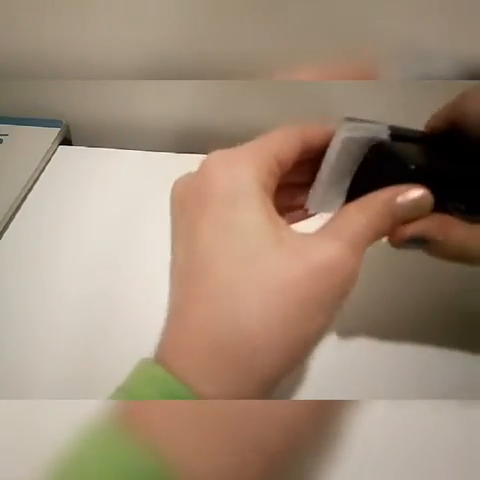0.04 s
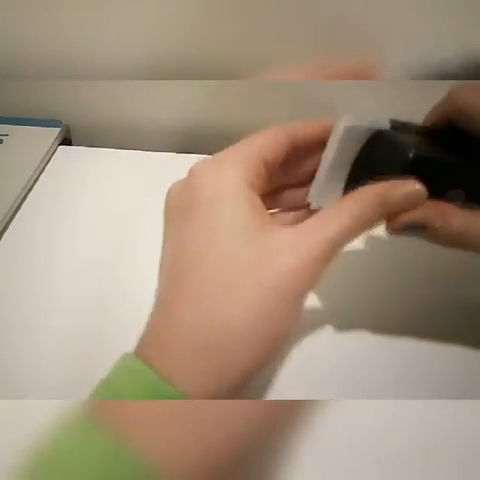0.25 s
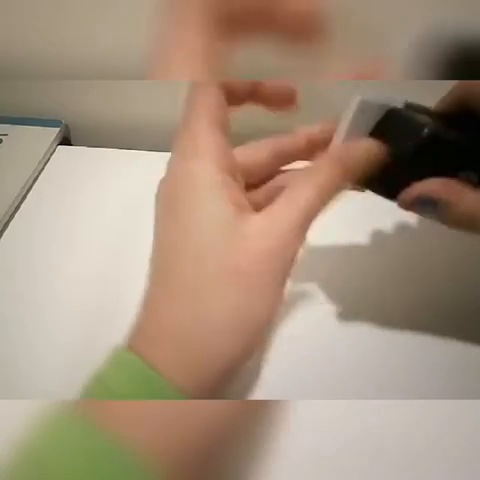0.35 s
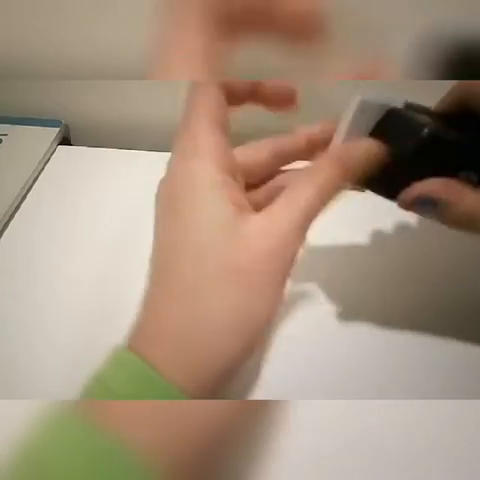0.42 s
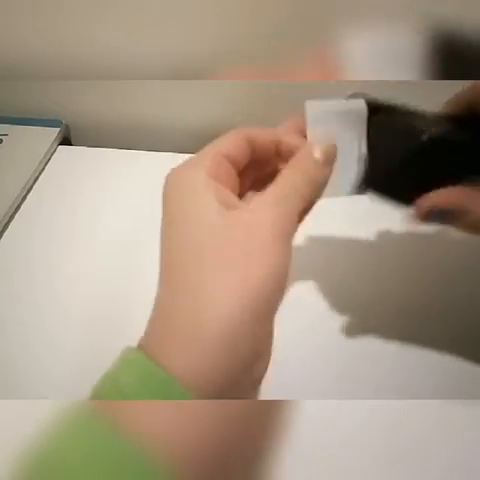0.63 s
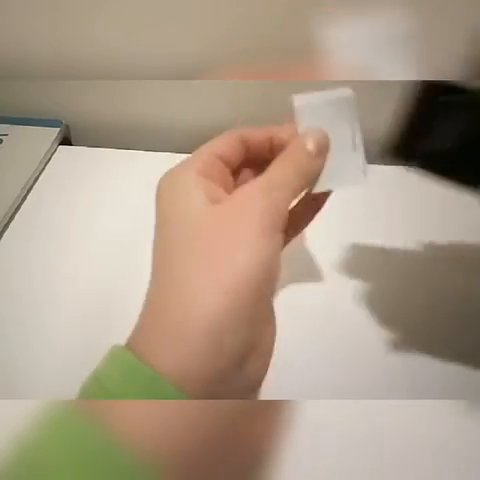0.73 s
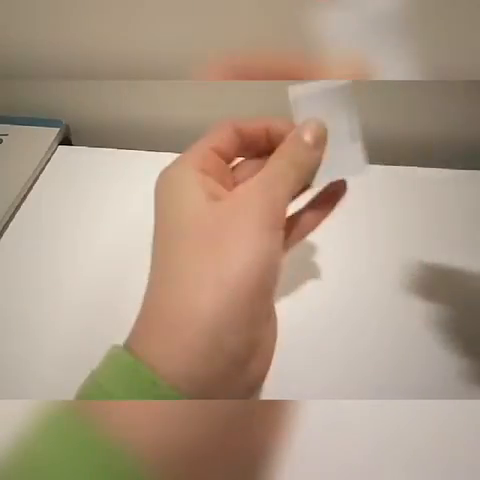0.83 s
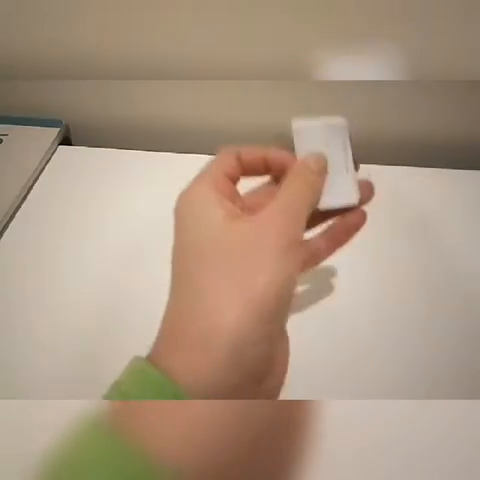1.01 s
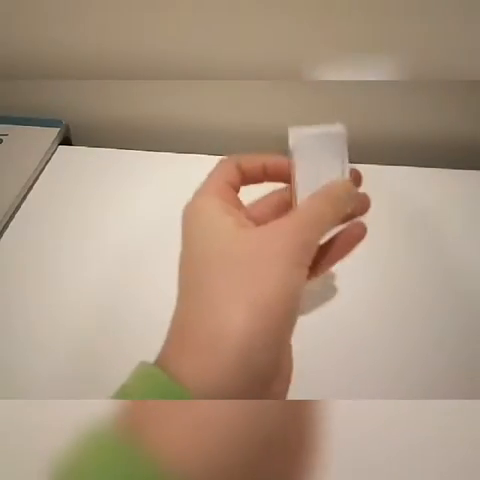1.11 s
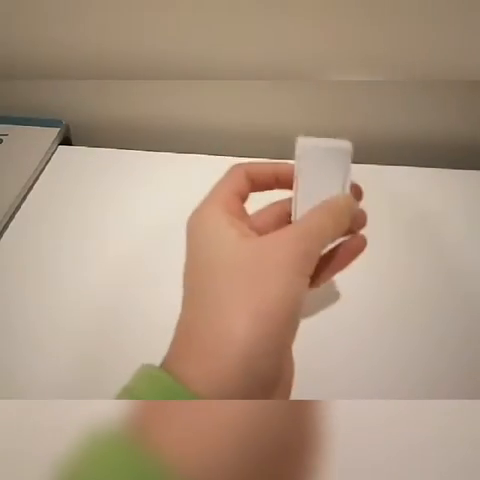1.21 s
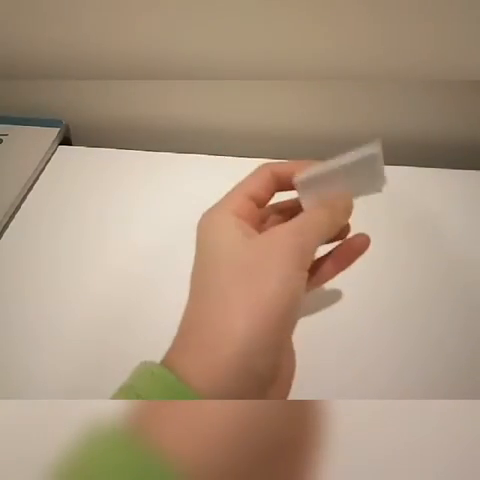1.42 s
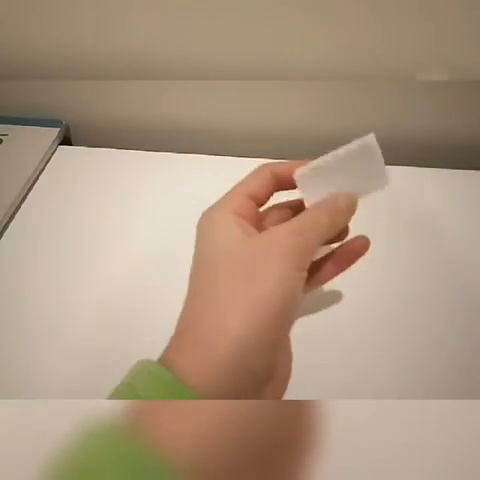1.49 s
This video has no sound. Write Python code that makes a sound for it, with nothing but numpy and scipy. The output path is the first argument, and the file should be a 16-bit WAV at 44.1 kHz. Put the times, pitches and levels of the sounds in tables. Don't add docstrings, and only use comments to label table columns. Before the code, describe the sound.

Close, sharp metallic stapler crunch with clicking spring release, followed by a crisp little paper flick

```python
import sys
import numpy as np
from scipy import signal
from scipy.fft import rfft, irfft
from scipy.io import wavfile
from scipy.ndimage import uniform_filter1d

SR = 44100
rng = np.random.default_rng(int(sys.argv[2]) if len(sys.argv) > 2 else 0)


def invert_db(x):
    u = np.asarray(x, float) / 20
    return 10 ** u


def wav_record(signal):
    frames = np.transpose(np.atleast_2d(signal))
    bounded = np.clip(frames, -1, 1)
    quanta = np.round(bounded * 32767).astype(np.int16)
    wavfile.write(sys.argv[1], SR, quanta)


N = 68355

KNEE_HZ = 6400

# pitch_hz, level_db (per Hz)
HISS_COLOUR = [(300, -7), (680, -10), (950, -11.5), (2400, -16.5), (6400, -20)]
# pitch_hz, level_db (per Hz)
RUMBLE_COLOUR = [(20, -16), (90, 1), (215, -2.5), (400, -13.5), (600, -32)]
# pitch_hz, t60_s
ROOM_T60 = [(150, 0.47), (500, 0.32), (1300, 0.36), (3200, 0.37), (6000, 0.37), (10000, .25)]
# start_s, level_db, centre_hz, ringing_hz, knock_db
SMALL_TICKS = [(0.092, -49, 5100, 1755, -54.5), (0.118, -59, 5500, 5300, -68),
               (0.1257, -42.5, 2940, 1300, -39.5), (0.137, -67, 3000, 3720, -49),
               (0.1792, -50.5, 1500, 2890, -48), (0.3555, -43, 4500, 4800, -85),
               (0.798, -49, 2970, 2390, -54), (0.865, -58, 2500, 1710, -53), (.94, -52.5, 4510, 3190, -46),
               (.988, -54, 2980, 5270, -72.5), (0.998, -54, 4500, 5570, -64), (1.014, -46, 900, 606, -73),
               (1.026, -54, 1680, 1810, -44), (1.034, -57, 2020, 1770, -46),
               (1.0434, -30.5, 3200, 4080, -35.5), (1.046, -22.5, 6240, 6480, -49),
               (1.049, -39.5, 5200, 4900, -46), (1.157, -55, 3000, 2150, -76),
               (1.191, -40.5, 3080, 3900, -59), (1.496, -46, 7000, 5200, -54.5),
               (1.496, -58, 2530, 1475, -71), (1.542, -57.5, 4200, 3900, -76)]
# start_s, level_db, pitch_hz
DESK_BUMPS = [
    (.797, -52.5, 85),
    (1.035, -47, 60),
    (1.045, -47.5, 146),
]
# start_s, peak_db, pitch_hz, swell_s
SHORT_PINGS = [(0.222, -52, 6800, 0.0022), (0.238, -29, 3500, 0.001), (.2405, -34, 4300, 0.0013),
               (0.3698, -36, 4370, .001), (.373, -38, 3580, 0.00087), (.383, -36.5, 1250, 0.0017),
               (0.5357, -28, 3200, 0.0014), (0.608, -34, 3264, 0.0022), (.646, -37.5, 3080, 0.0022),
               (.682, -47.5, 3180, 0.0028), (.796, -48.5, 3280, 0.0013), (0.797, -51.5, 1720, 0.0019),
               (.797, -57, 5550, 0.0011), (.987, -53, 3130, 0.0016), (1.0254, -38.5, 1840, 0.0018),
               (1.033, -34, 1830, 0.0014), (1.034, -37, 3100, .001), (1.037, -40, 6140, 0.0013),
               (1.0435, -29, 3350, 0.00068), (1.0485, -22, 4820, 0.00073), (1.053, -35, 4800, 0.0018),
               (1.064, -38.5, 3900, .001), (1.069, -36, 4800, 0.00093), (1.081, -44, 6760, 0.0018),
               (1.087, -42.5, 4870, 0.0033), (1.091, -49, 6420, 0.0015), (1.136, -53, 3900, 0.0011),
               (1.15, -49, 3900, 0.0018), (1.154, -44, 3120, 0.0011), (1.161, -45, 3260, .0015),
               (1.161, -49, 5630, 0.0011), (1.167, -48, 5500, 0.00088), (1.186, -45, 3900, .0015),
               (1.192, -38, 3010, 0.0012), (1.196, -36, 3900, .001), (1.199, -44, 3850, 0.0011),
               (1.199, -51, 4900, 0.0028), (1.207, -42, 3100, 0.00072), (1.215, -49, 3260, .0015),
               (1.174, -53.5, 530, 0.0033), (1.193, -60, 593, 0.0047), (1.497, -49.5, 1446, 0.0019),
               (1.495, -51, 5150, 0.0017), (1.495, -47, 6280, 0.0011), (1.496, -54, 3100, 0.0014),
               (0.547, -37, 1280, 0.0034), (0.556, -32, 1377, 0.0036), (.575, -36, 1216, .003),
                (.61, -32, 1361, 0.0076), (0.637, -38, 1249, .005), (0.654, -44.5, 1270, 0.0041),
                (1.053, -43.5, 2010, 0.0021), (1.057, -34, 8400, .0015), (1.153, -52, 1960, 0.0018),
                (1.16, -52, 2050, .002), (1.19, -52.5, 1430, 0.0047), (.125, -37, 11400, .0006)]
# start_s, rise_s, fall_s, level_db, thud_lead_s
SNAPS = [
    (.2290, 0.0029, 0.0017, -15, 0.00045),
    (0.3611, 0.0016, .0016, -17.5, 0.0008),
    (0.5238, 0.0031, .0018, -19, 0.0015),
]
# pitch_hz, width_hz, level_db
SNAP_BODIES = [
    [(386, 148, -9), (1028, 95, -26.5), (1860, 91, -14.5), (2470, 63, -33.5), (2924, 99, -9),
     (3513, 150, 0.5), (4380, 140, -14), (4900, 270, -7), (5507, 230, -9), (7100, 93, -19)],
    [(474.4, 140, -6.5), (1184, 430, -7), (1864, 180, -9.0), (2478, 75, -7), (3396, 430, -4.0),
     (3900, 330, -9.0), (5470, 240, -30), (5520, 410, -8), (6654, 120, -22.0),
     (7110, 120, -18.0)] + [(678, 180, -21.5)],
    [(335, 300, -5.5), (1209, 170, -4.5), (1728, 120, -5.5), (2945, 110, -2.5), (3268, 170, 3.0),
     (3932, 430, 0.0), (4806, 120, -3), (5680, 330, -15), (6350, 150, -7.5),
     (7070, 330, -47.0)] + [(800, 200, -20.0), (2202, 67, -12), (5270, 200, -10)],
]
# pitch_hz, level_db (per Hz)
CRACK_COLOUR = [(40, -54), (120, -31.5), (400, -16), (800, -30.5), (1800, -13), (2400, -11.5), (3400, -3),
                (6400, -6)]
CRACK_LEVELS = [-5, -11.5, -3.5]
# level_db, ducking_db, recovery_s, decay_scale, damped_at_s
ROOM_ANSWERS = [
    (-24.5, 4.5, 0.042, 0.92, 0.3415),
    (-33.5, -10.5, 0.0106, 0.95, .51),
    (-24, 6.5, 0.044, 1.132, 0.96),
]
# pitch_hz, level_db (per Hz)
ANSWER_COLOURS = [
    [(100, -29), (420, -6.5), (760, -22), (1500, -12.5), (3500, -6), (6400, -4)],
    [(150, -39), (500, -5), (1370, -7.5), (3400, -4), (6400, -10.5)],
    [(130, -28), (530, -11.5), (700, -13.5), (1240, -3.5), (1550, -11), (4200, -9.5), (6400, -12)],
]
# pitch_hz, width_hz, boost_db
SPRING_RINGS = [
    [(959, 250, 5), (1380, 78, 9), (3500, 420, 8), (4460, 220, 8)],
    [(1300, 250, 8.5), (3423, 230, 3.5), (4300, 200, 1)],
    [(1250, 330, 4), (1350, 190, 4.5), (2990, 60, 12), (3200, 140, 8.5), (4400, 120, 6.5)],
]
DESK_LEVELS = [-20, -15, -21]
# start_s, level_db
FLICK_PRESSURE = [(0.993, -62), (1.015, -52), (1.042, -33), (1.05, -32.5), (1.072, -41), (1.1, -55),
                  (1.13, -51.5), (1.161, -64)]
# start_s, level_db
RUB_PRESSURE = [(1.13, -64), (1.152, -52.5), (1.172, -49), (1.185, -42.5), (1.198, -38.5), (1.215, -48.5),
                (1.239, -60), (1.28, -72)]
# pitch_hz, level_db (per Hz)
PAPER_COLOURS = [
    [(100, -11), (1000, -14), (1400, -9), (2800, -16.5), (6400, -12)],
    [(100, -21.5), (560, -10.5), (900, -23), (2400, -8.5), (3900, -4), (6400, -11)],
]
# pitch_hz, width_hz, boost_db
SHEET_BANDS = [(1870, 320, 7), (3950, 570, 6.5), (4800, 250, 5.5), (6270, 257, 5)]
# pitch_hz, level_db
MIC_RESPONSE = [(30, -2.5), (70, 0), (6300, -0.5), (6900, -8), (7800, -18.5), (9000, -21), (12000, -31),
                (15500, -26)]


def evened(x):
    return x / np.sqrt(np.mean(x ** 2) + 1e-20)


def read(points, hz):
    f, value = np.transpose(points)
    return np.interp(np.log(hz + 1), np.log(f + 1), value)


def source_colour(points, hz):
    return read(points, np.minimum(hz, KNEE_HZ))


def octaves_above(hz, start_hz):
    return np.log2(np.maximum(hz / start_hz, 1))


def resonances(bands, hz):
    return sum(db / (1 + (2 * (hz - f) / width) ** 2) for f, width, db in bands)


def coloured(x, curve_db):
    hz = np.fft.rfftfreq(len(x), 1 / SR)
    return evened(irfft(rfft(x) * invert_db(curve_db(hz)), len(x)))


def add(mix, start_s, sound):
    part = mix[round(start_s * SR):][:len(sound)]
    part += sound[:len(part)]


def drift(size):
    return evened(uniform_filter1d(uniform_filter1d(rng.standard_normal(N), size), size))


def room_floor():
    hiss = coloured(rng.standard_normal(N), lambda hz: source_colour(HISS_COLOUR, hz) - 30 * (hz < 300))
    rumble = coloured(rng.standard_normal(N),
                      lambda hz: read(RUMBLE_COLOUR, hz) - 40 * np.clip(hz / 300 - 1, 0, 2))
    return hiss * invert_db(-62.5 + drift(2000)) + rumble * invert_db(-65.5 + 1.5 * drift(1200))


def room_tail(colour_db, decay_scale, rings=(), size=22050):
    bloom_s = 0.035
    hz, t, z = signal.stft(rng.standard_normal(size), SR, nperseg=512)
    colour = colour_db(hz)
    bloom = 1 - np.exp(-t / bloom_s)
    z = z * invert_db(colour[:, None] + resonances(rings, hz[:, None]) * bloom)
    z = z / np.sqrt(np.mean(invert_db(2 * colour)))
    t60_s = decay_scale * read(ROOM_T60, hz)[:, None]
    return signal.istft(z * invert_db(-60 * t / t60_s), SR, nperseg=512)[1][:size]


def small_ticks():
    fall_s, knock_fall_s, rise_s = 0.0041, 0.0017, 0.00065
    spread, band_db, room_db = 0.87, -10, -14.5
    out, t = np.zeros(N), np.arange(1024) / SR
    for start_s, db, centre_hz, band_hz, knock_db in SMALL_TICKS:
        def colour(hz):
            return np.maximum(-6 * (np.log((hz + 50) / centre_hz) / spread) ** 2, -40)
        puff = coloured(rng.standard_normal(len(t)), colour)
        puff += invert_db(band_db) * 2 * np.sin(2 * np.pi * band_hz * t)
        knock_hz = 516 * rng.uniform(0.87, 0.98)
        knock = np.sin(2 * np.pi * knock_hz * t) * np.exp(-t / knock_fall_s)
        tick = invert_db(db + 3) * puff * np.exp(-t / fall_s) + invert_db(knock_db + 6) * knock
        add(out, start_s, np.clip(t / rise_s, 0, 1) * tick)
        echo = room_tail(colour, 0.77, size=8192)
        fade_in = np.clip(np.arange(len(echo)) / 200, 0, 1)
        add(out, start_s, echo * fade_in * invert_db(db + room_db))
    return out


def pings():
    out, t = np.zeros(N), np.arange(2048) / SR
    for start_s, db, hz, swell_s in SHORT_PINGS:
        swell = (t / swell_s * np.exp(1 - t / swell_s)) ** 1.2
        add(out, start_s, invert_db(db) * swell * np.sin(2 * np.pi * hz * t))
    return out


def snap(rise_s, fall_s, level_db, lead_s, body, crack_db):
    t = np.arange(0, 0.03, 1 / SR)
    after_thud = t - lead_s
    phases = rng.uniform(0, 2 * np.pi, 16)
    out = np.zeros(len(t))
    for (hz, width_hz, db), phase in zip(body, phases):
        bright = hz > 700
        u = after_thud if bright else t
        decay = np.exp(-(np.maximum(u - rise_s, 0) / fall_s * width_hz / 240) ** 1.3)
        shape = np.clip(u / rise_s, 0, 1) ** 2 * decay
        tone = np.sin(2 * np.pi * hz * t + phase * bright)
        out += invert_db(db) * np.sqrt(width_hz / 160) * shape * tone
    crack = coloured(rng.standard_normal(len(t)),
                     lambda hz: source_colour(CRACK_COLOUR, hz) - 5 * octaves_above(hz, KNEE_HZ))
    decay = np.exp(-(np.maximum(after_thud - rise_s, 0) / fall_s / 2.2) ** 2.4)
    out += invert_db(crack_db) * crack * np.clip(after_thud / rise_s, 0, 1) ** 2 * decay
    return invert_db(level_db + 5.5) * out


def snap_answer(start_s, answer, colour, rings, desk_db):
    level_db, duck_db, recovery_s, decay_scale, damped_at_s = answer
    desk_hz, desk_t60_s, damp_s = 521, 0.45, 0.0046
    echo = room_tail(lambda hz: source_colour(colour, hz) - 8.5 * octaves_above(hz, KNEE_HZ),
                     decay_scale, rings)
    t = np.arange(len(echo)) / SR
    waver = np.cumsum(uniform_filter1d(rng.standard_normal(len(t)), 900)) * 0.06
    echo = echo + invert_db(desk_db - 60 * t / desk_t60_s) * np.sin(2 * np.pi * desk_hz * t + waver)
    damped = invert_db(-12 * np.clip((t + start_s - damped_at_s) / damp_s, 0, 1))
    gain = invert_db(level_db - duck_db * np.exp(-t / recovery_s))
    return echo * np.clip(t / 0.0026, 0, 1) * damped * gain


def stapler():
    out = np.zeros(N)
    for row, body, crack_db, answer, colour, rings, desk_db in zip(
            SNAPS, SNAP_BODIES, CRACK_LEVELS, ROOM_ANSWERS, ANSWER_COLOURS, SPRING_RINGS, DESK_LEVELS):
        start_s, rise_s, fall_s, level_db, lead_s = row
        add(out, start_s - lead_s, snap(rise_s, fall_s, level_db, lead_s, body, crack_db))
        add(out, start_s, snap_answer(start_s, answer, colour, rings, desk_db))
    return out


def desk_bumps():
    fall_s = 0.0043
    out, t = np.zeros(N), np.arange(4096) / SR
    for start_s, db, hz in DESK_BUMPS:
        swell = t / fall_s * np.exp(-t / fall_s)
        add(out, start_s, invert_db(db + 10) * swell * np.sin(2 * np.pi * hz * t))
    return out


def patchy(x):
    patch_db = 5
    z = signal.stft(x, nperseg=128)[2]
    field = uniform_filter1d(rng.standard_normal(z.shape), 3, axis=0)
    field = evened(uniform_filter1d(field, 4, axis=1))
    return evened(signal.istft(z * invert_db(patch_db * field), nperseg=128)[1][:N])


def paper():
    grains_per_s, grain_db, clump_s = 7900, 2, 0.0015
    out = np.zeros(N)
    for pressure, colour in zip((FLICK_PRESSURE, RUB_PRESSURE), PAPER_COLOURS):
        grains = (rng.random(N) < grains_per_s / SR) * invert_db(grain_db * rng.exponential(1, N))
        clumps = evened(signal.lfilter([1], [1, -np.exp(-1 / (clump_s * SR))], grains))

        def sheet(hz):
            sparkle = 2 * octaves_above(hz, 9000)
            return source_colour(colour, hz) + resonances(SHEET_BANDS, hz) + sparkle
        rustle = coloured((clumps + 0.86) * rng.standard_normal(N), sheet)
        s, db = np.transpose(pressure)
        out += patchy(rustle) * invert_db(np.interp(np.arange(N) / SR, s, db, -100, -100))
    return out


def scene():
    return (stapler() + small_ticks() + desk_bumps() + paper() + pings() + room_floor())[None]


def roll_off(x):
    return signal.sosfilt(signal.butter(12, 16390, fs=SR, output="sos"), x)


def record(dry):
    ceiling, edge_hz = 0.85, 15500
    noise_db, step_db, step_hz = -73, 11, 14120
    hz = np.fft.rfftfreq(N, 1 / SR)
    fizz = coloured(rng.standard_normal(N), lambda f: step_db * np.clip((f - step_hz) / 600, 0, 1))
    limited = ceiling * np.tanh(dry / ceiling)
    heard = rfft(limited) * invert_db(read(MIC_RESPONSE, hz)) + rfft(fizz * invert_db(noise_db))
    band_edge = invert_db(-60 * np.clip((hz - edge_hz) / 400, 0, 1))
    return roll_off(irfft(heard * band_edge, N))


dry = scene()
out = record(dry)
wav_record(out)
```